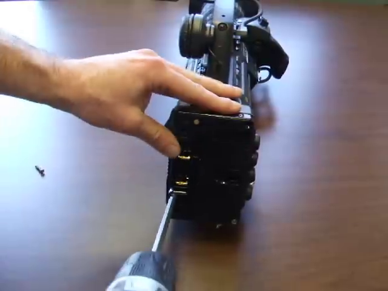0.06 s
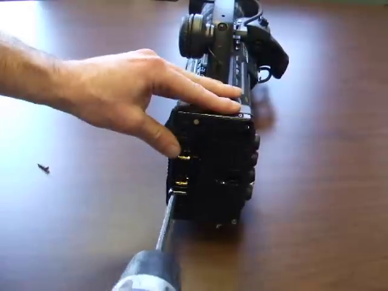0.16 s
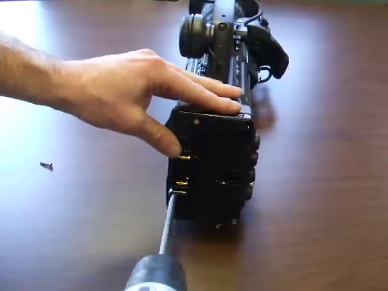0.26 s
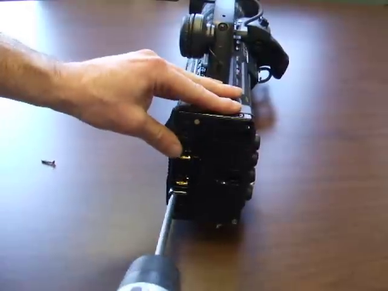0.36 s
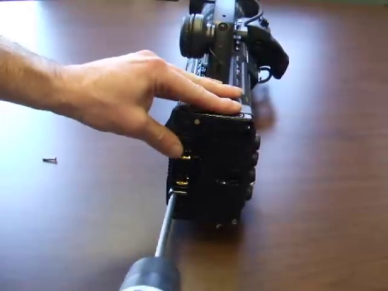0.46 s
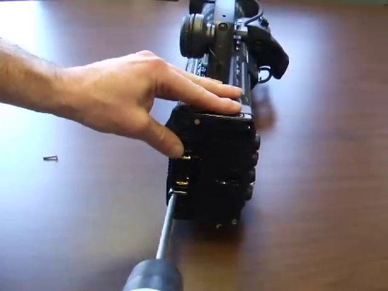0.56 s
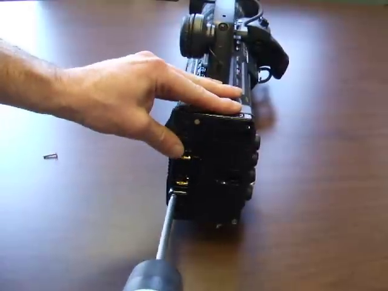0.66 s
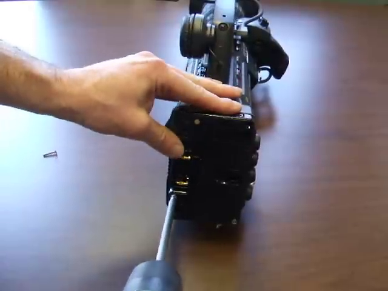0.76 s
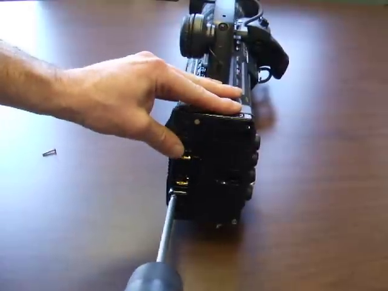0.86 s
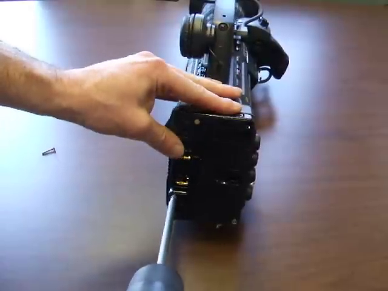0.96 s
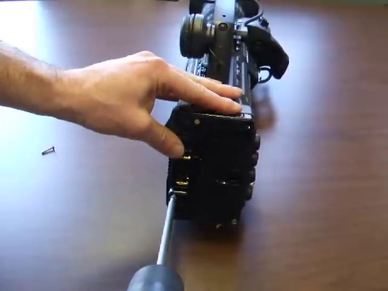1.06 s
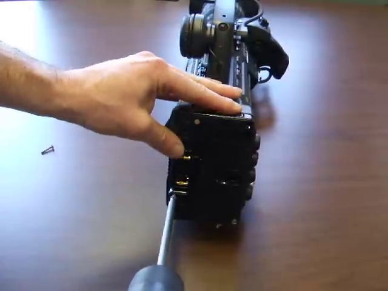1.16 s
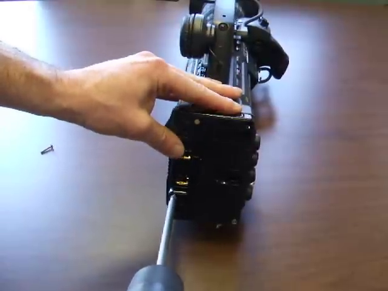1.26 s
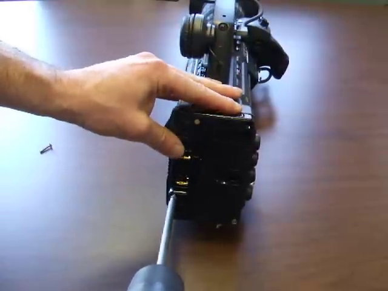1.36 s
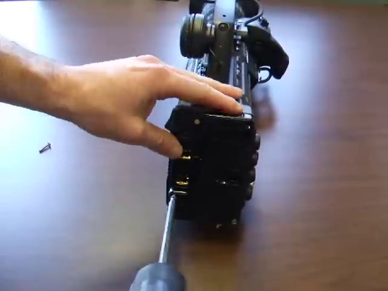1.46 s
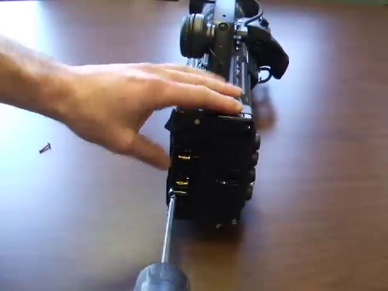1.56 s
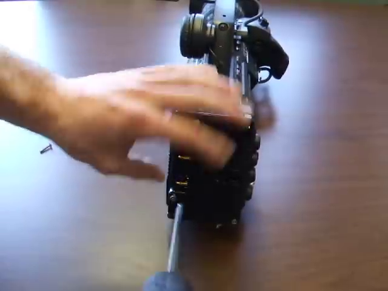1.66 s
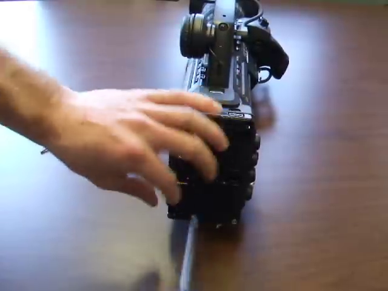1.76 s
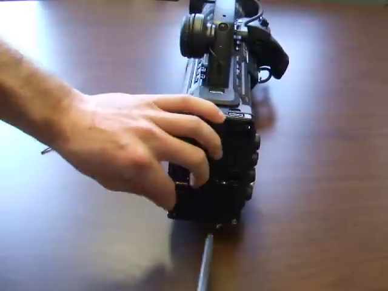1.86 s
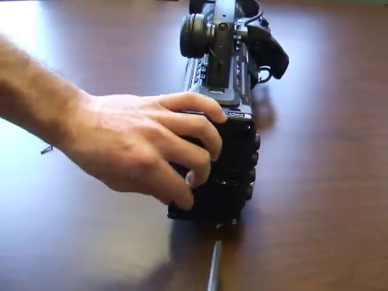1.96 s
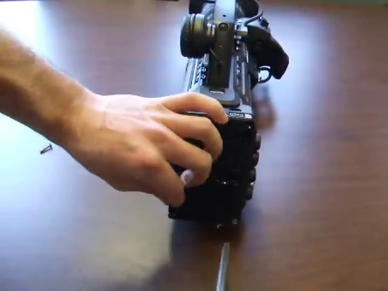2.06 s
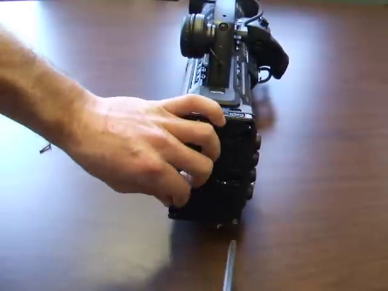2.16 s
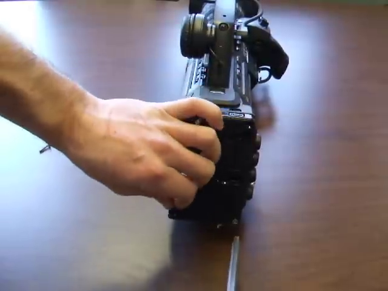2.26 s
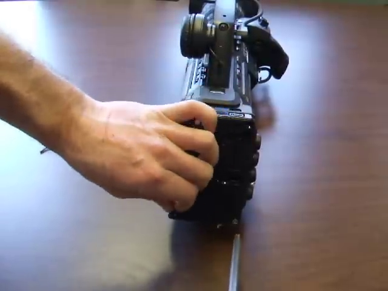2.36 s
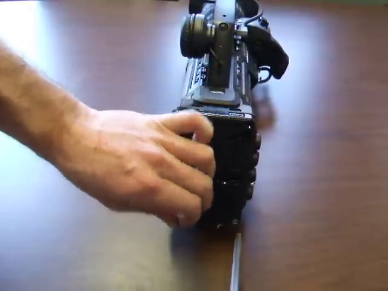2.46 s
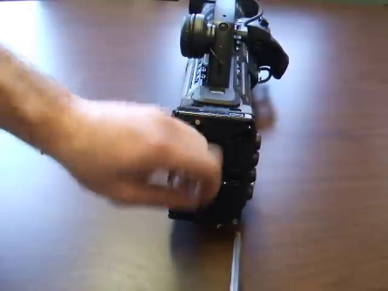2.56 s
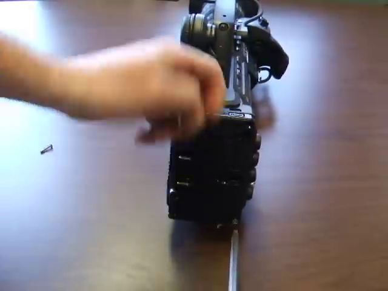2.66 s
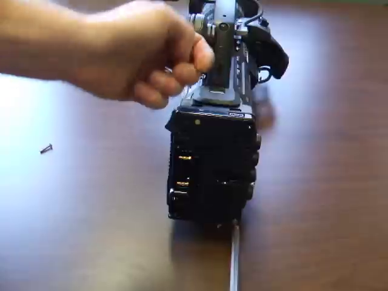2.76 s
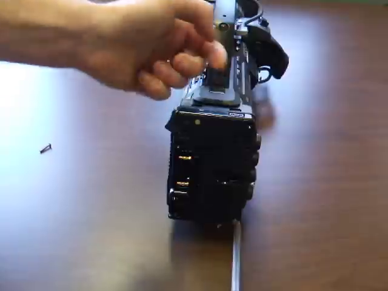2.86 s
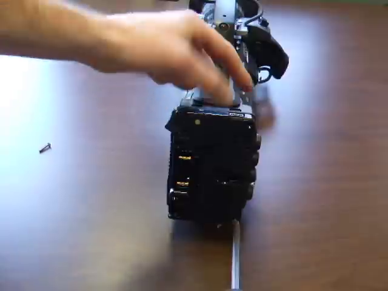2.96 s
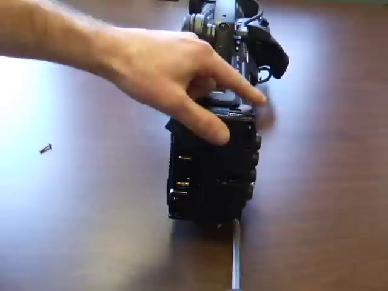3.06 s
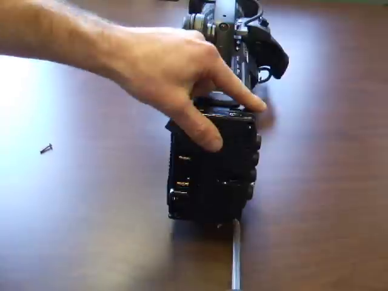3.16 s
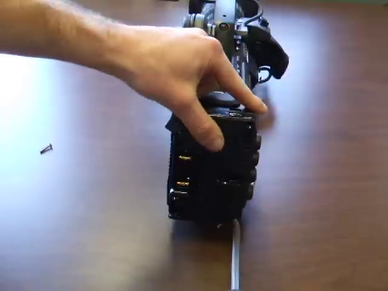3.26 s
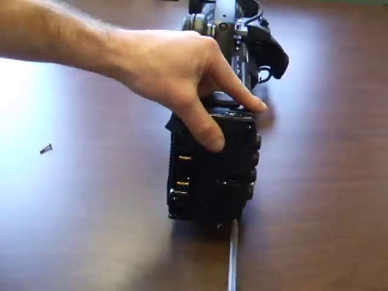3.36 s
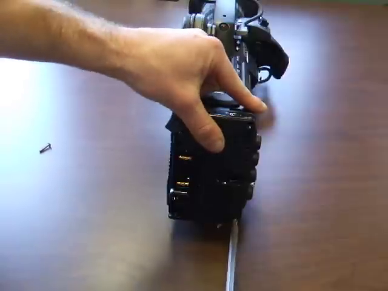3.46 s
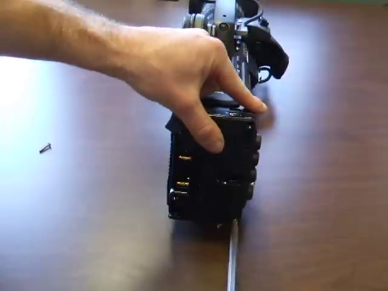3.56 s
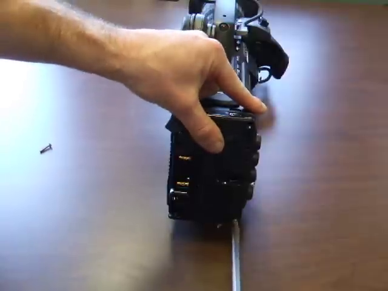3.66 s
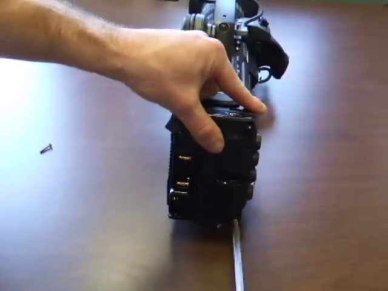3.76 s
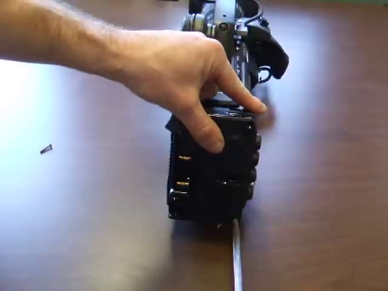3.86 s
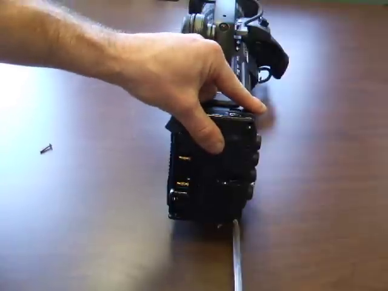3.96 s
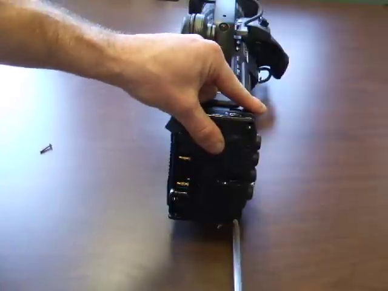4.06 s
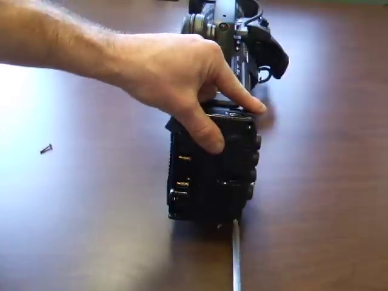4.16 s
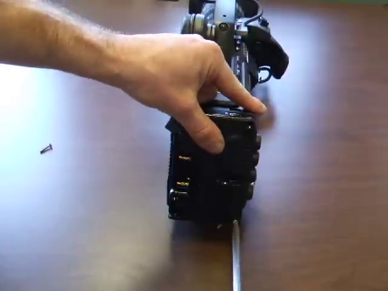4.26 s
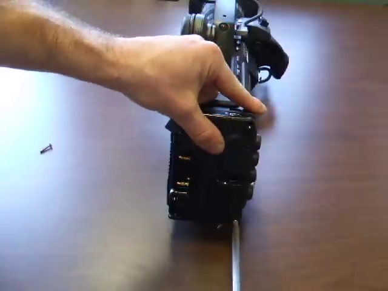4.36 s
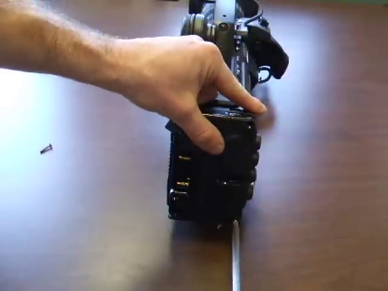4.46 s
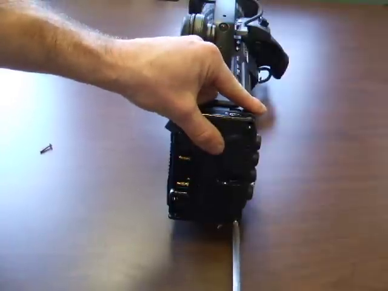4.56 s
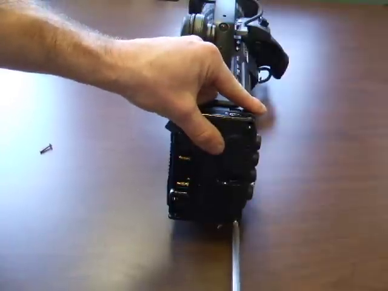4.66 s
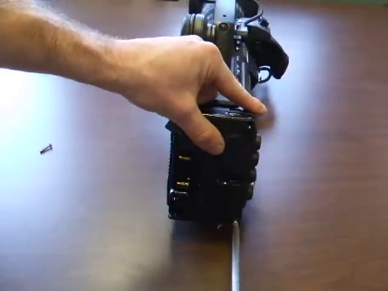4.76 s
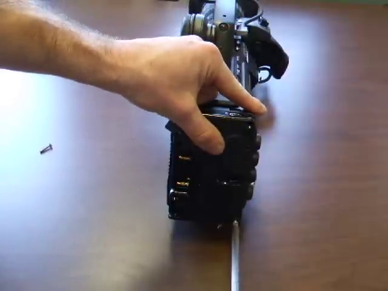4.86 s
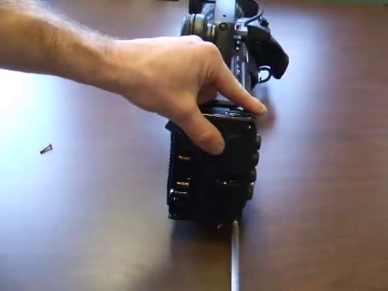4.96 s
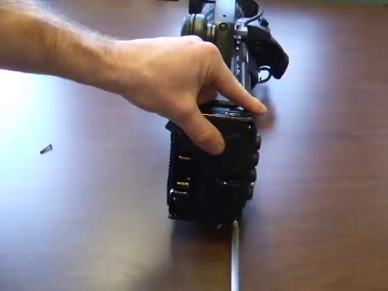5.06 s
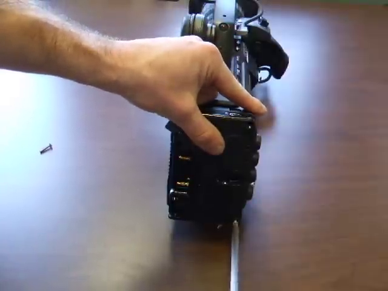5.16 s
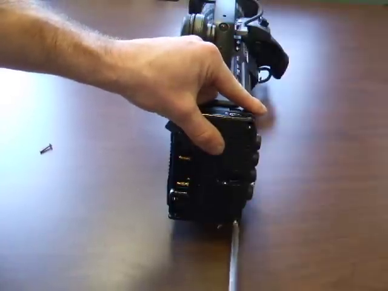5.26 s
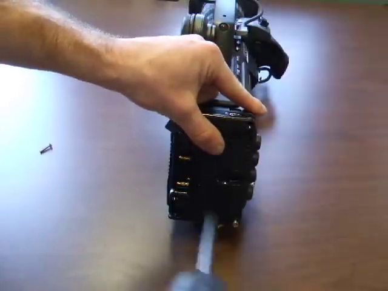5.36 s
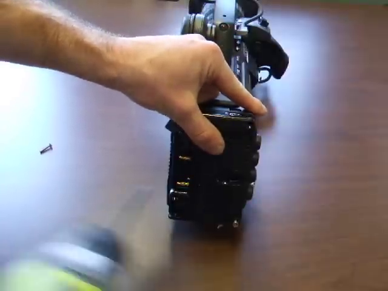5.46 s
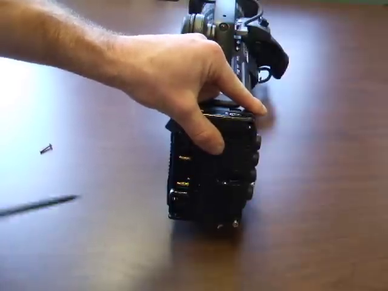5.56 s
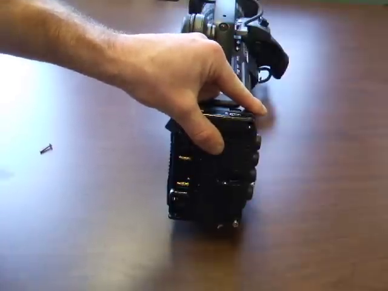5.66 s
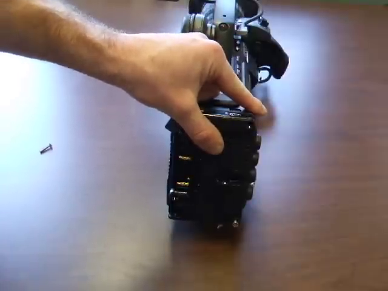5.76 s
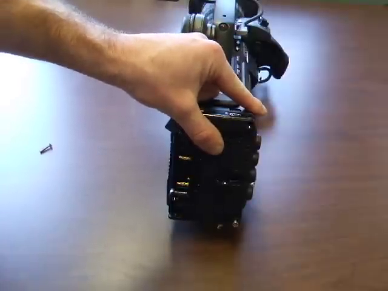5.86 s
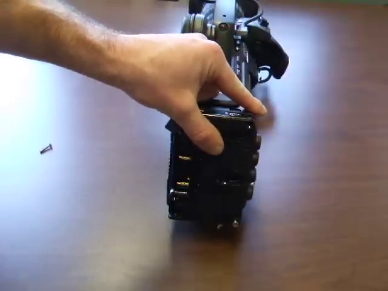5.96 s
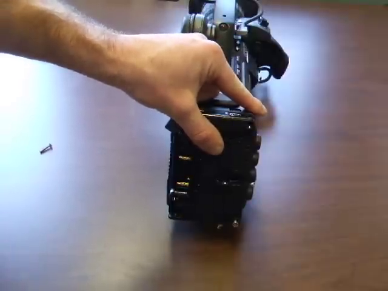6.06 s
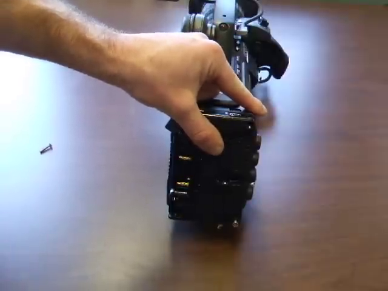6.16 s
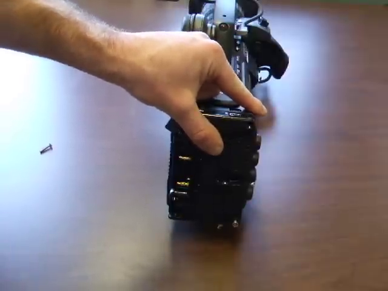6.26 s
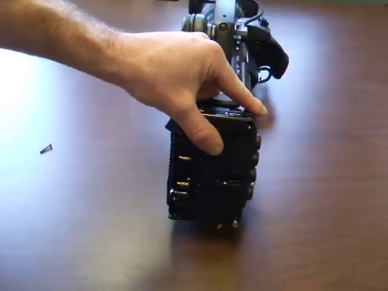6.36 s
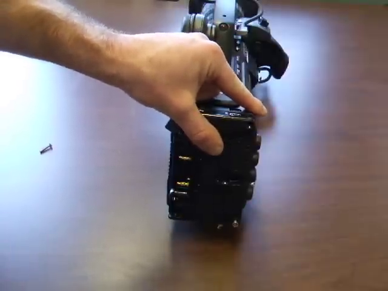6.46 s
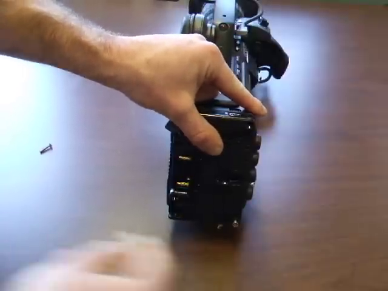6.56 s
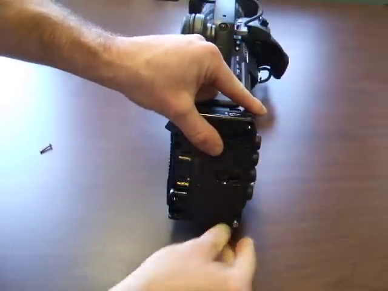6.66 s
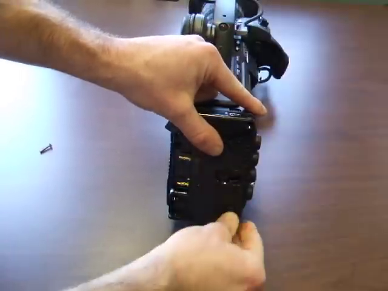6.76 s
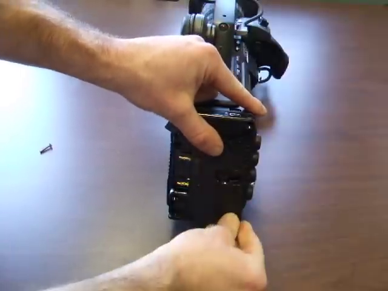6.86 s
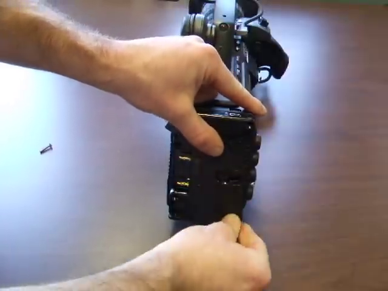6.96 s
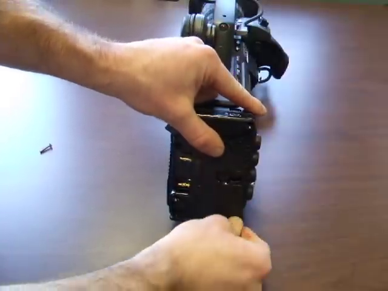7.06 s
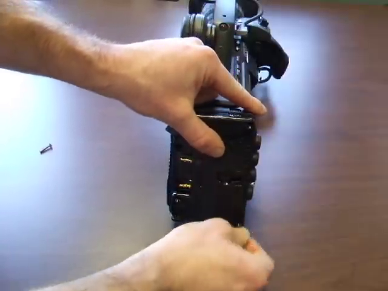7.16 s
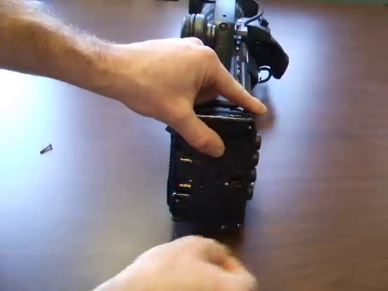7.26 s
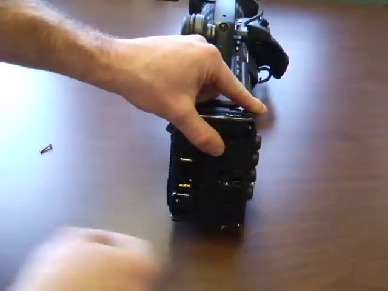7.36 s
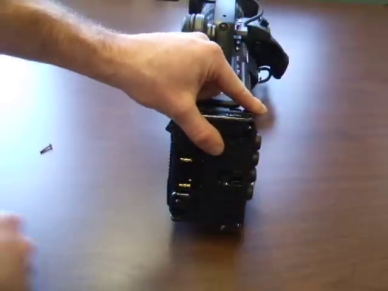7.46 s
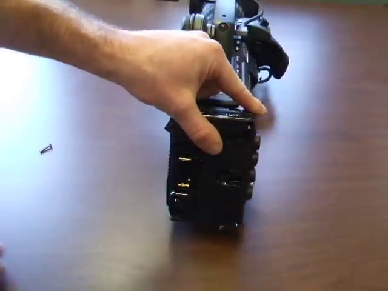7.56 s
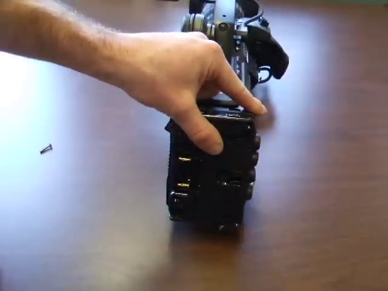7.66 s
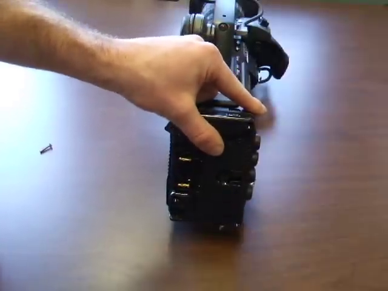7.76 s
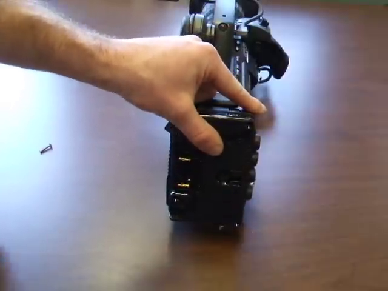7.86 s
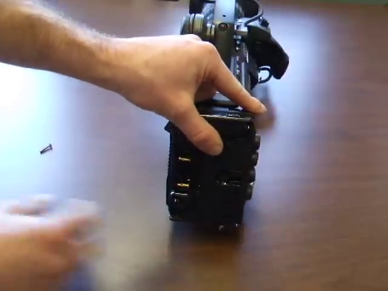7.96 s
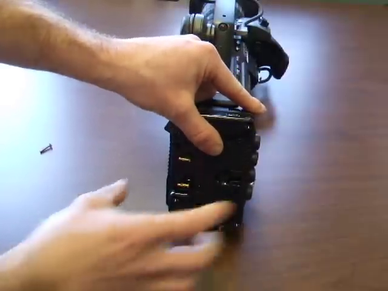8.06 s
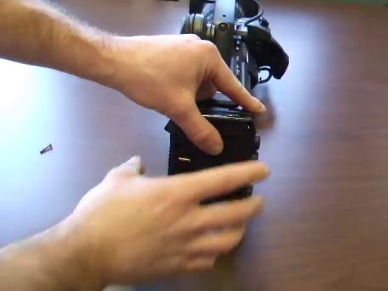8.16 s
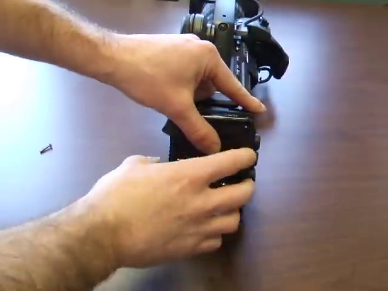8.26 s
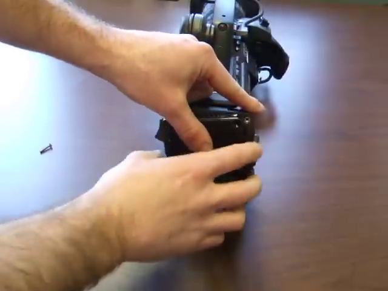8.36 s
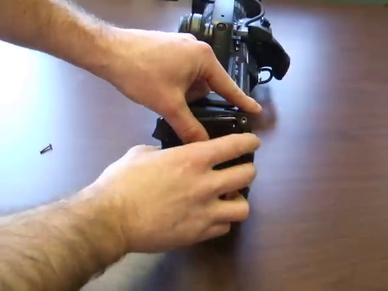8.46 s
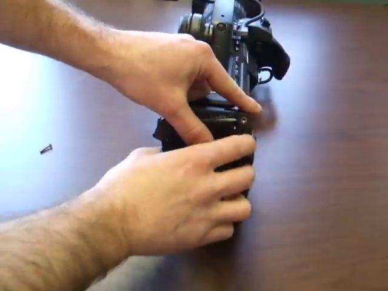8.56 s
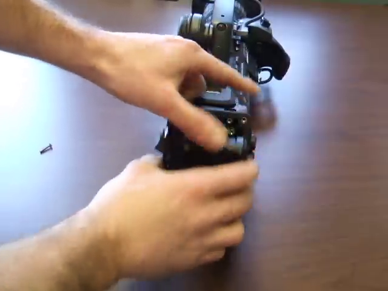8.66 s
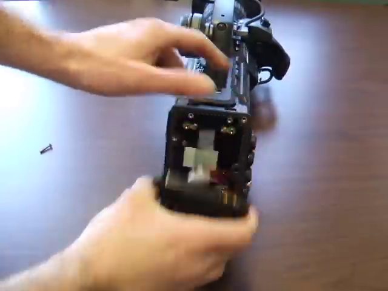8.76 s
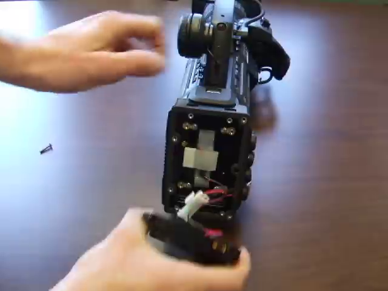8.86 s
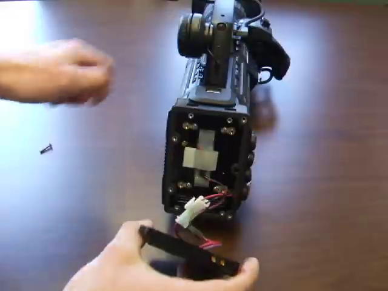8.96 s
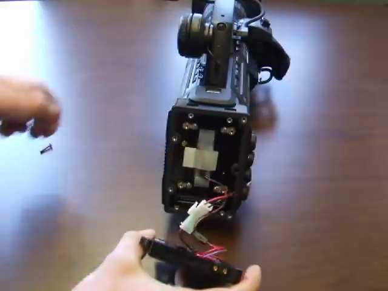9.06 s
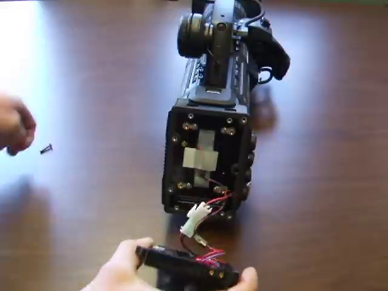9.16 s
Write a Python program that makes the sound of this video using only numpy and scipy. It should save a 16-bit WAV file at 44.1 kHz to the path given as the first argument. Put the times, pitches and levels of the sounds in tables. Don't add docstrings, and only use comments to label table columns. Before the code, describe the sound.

A cordless drill whirs in two roughly one-second bursts on a wooden desk, with sharp bit clatter, screw rattles and small plastic clicks between.

```python
import sys
import numpy as np
from scipy import signal
from scipy.fft import rfft, irfft, next_fast_len
from scipy.io import wavfile
from scipy.ndimage import uniform_filter1d

SR = 44100
rng = np.random.default_rng(int(sys.argv[2]) if len(sys.argv) > 2 else 0)


def store_wav(level_fs):
    pcm = np.round(np.clip(np.atleast_2d(level_fs), -1, 1) * 32767)
    wavfile.write(sys.argv[1], SR, pcm.T.astype(np.int16))


def ratio(d):
    e = np.asarray(d, float) / 20
    return 10 ** e


N = 406591
TIME = np.arange(N) / SR

# pitch_hz, density_db (dB per Hz)
AIR = [(12, -52), (20, -8.5), (32, -26), (49, -15.5), (161, -12), (211, -20.5), (422, -9.5), (785, -17),
       (1140, -17.5), (1650, -21), (1820, -19), (3390, -24.5), (7500, -22.5), (9750, -76), (16500, -120)]
# centre_hz, width_hz, level_db
FAN = [(55.4, 5.6, -61.5), (380.7, 22, -56), (431, 16.4, -51), (493.5, 12, -54), (1220, 140, -64)]
# pitch_hz, level_db
DRIVE = [(610.6, -60.5), (2443, -66), (5494, -70.5), (6105, -69)]
# time_s, level_db
DRIVE_TONE = [(0, -64), (4, -71.5), (5.5, -66.5), (7, -59), (7.6, -58.5), (9.22, -65.5)]
# centre_hz, spread_hz, strongest_line_db
CHIRPS = [(7867, 26, -62.5), (8134, 26, -66.5)]
# pitch_hz, gain_db
MIC = [(10, 1.5), (8200, -0.5), (8550, -11.5), (8900, -21.5), (9050, -49.5), (9300, -71)]

# pitch_hz, level_db, t60_s
DESK = [(100, -0.5, 0.052), (153.4, -0.5, 0.063), (242, -4.5, 0.084), (349, 6.5, 0.074), (506, -3, 0.19),
        (713, -6.5, 0.2), (1030, -5.5, 0.056)]
# start_s, peak_db, strongest_mode_hz, t60_scale
KNOCKS = [(0.223, -15.5, 390, 0.59), (2.302, -29.5, 427, 2.1), (2.316, -37, 380, 2.5), (2.41, -32, 433, 1),
          (3.058, -34.5, 150, 2.5), (3.357, -31.5, 415, 1.3), (3.694, -27, 364, 1.1),
          (6.191, -29, 172, 1.1), (6.244, -18.5, 168, 0.65), (7.112, -48, 166, 1.4), (7.158, -28, 173, 0.9),
          (8.871, -34.5, 431, 1.1), (9.074, -40, 366, 0.92)]
# start_s, level_db, hold_s, upper_knock_db
BUMPS = [
    (3.06, -43.5, 0.043, -53),
    (3.356, -40.5, 0.069, -37),
    (3.695, -29.5, 0.017, -24.5),
    (6.247, -35.5, 0.09, -23.5),
    (7.099, -41, 0.038, -44),
    (8.89, -44.5, 0.083, -41),
]
# start_s, level_db, hold_s, fall_db_per_s
RUBS = [
    (2.341, -31, .001, 867),
    (2.42, -25, .001, 2300),
    (7.16, -23.5, .001, 1500),
    (7.732, -43, .012, 2100),
    (7.74, -38.5, 0.04, 2100),
    (7.789, -26, .001, 550),
    (8.679, -46, .001, 300),
    (8.722, -50, .035, 1100),
    (8.87, -34.5, .001, 450),
]

# start_s, peak_db, ring_hz, crack_db (relative), crack_hz
BIT_TICKS = [(.1261, -35, 7220, -14, 2050), (.2224, -13, 6130, -8, 2120), (.2259, -11, 4610, -8, 2190),
             (.2344, -10, 7120, -15, 1410), (.2484, -17, 3340, -7, 1840), (.2583, -11, 3360, -12, 1900),
             (.2704, -14, 5190, -14, 2030), (.2828, -15, 7110, -13, 1450), (.2912, -11, 3590, -16, 2320),
             (.3167, -7, 4620, -22, 2330), (1.4814, -18, 6200, -6, 1320), (3.056, -29, 5440, -3, 1390),
             (3.3578, -30, 5410, -3, 2470), (3.6895, -14, 5560, -7, 2300), (4.0054, -17, 5810, -10, 1740),
             (6.1928, -22, 3250, -5, 1390), (6.2437, -25, 3050, -7, 1140)]
# start_s,
# peak_db, ring_hz, crack_db (relative)
LONE_TICKS = [(1.8477, -31, 4180, -9), (1.9106, -37, 6100, -12), (2.1655, -35, 3570, -13),
              (2.1984, -20, 5650, -26), (2.2174, -35, 5730, -15), (2.2618, -37, 4370, -6),
              (2.3424, -20, 5630, -17), (7.0354, -13, 5530, -21), (7.0579, -28, 5540, -17),
              (7.1137, -11, 5520, -26), (7.1606, -13, 6030, -23), (7.0803, -20, 5540, -19),
              (7.0983, -14, 6340, -24), (7.7872, -14, 7350, -20), (7.7904, -15, 7390, -25),
              (7.8024, -25, 3600, -18), (8.4417, -39, 6850, -6), (8.6857, -33, 6630, -17),
              (8.7494, -33, 7190, -14), (8.8727, -22, 7300, -8), (9.0744, -43, 6700, -1),
              (9.0957, -33, 7100, -8)]
# start_s, gap_s, hits, peak_db, ring_hz
RATTLES = [
    (2.3002, .0092, 4, -17, 7350),
    (2.4034, .006, 5, -19, 5500),
    (7.0164, .0068, 3, -20, 5700),
    (7.1245, .0102, 4, -19, 5600),
]

# time_s, pitch_hz, level_db
TRIGGER = [
    [(.145, 6000, -60), (.155, 5750, -44), (.195, 5400, -42), (.205, 5300, -60)],
    [(3.938, 7200, -50), (3.948, 5800, -44), (3.96, 5350, -38), (3.978, 5100, -38), (3.985, 5100, -60)],
]
# start_s, squeeze_s, settle_s, settle_shape, release_s
PULL_A, PULL_B = (.16, .146, .063, .9, 1.424), (3.953, .085, .082, .75, 5.226)
# time_after_release_s, speed_left (share)
BRAKE = [(0, 1), (.034, .955), (.047, .86), (.058, .66), (.069, .51), (.113, .29)]
# time_s, level_db
EFFORT_A, EFFORT_B = [(.16, -41.5), (.206, -24.5), (.236, -20), (.248, -30.5), (.35, -26.5), (.55, -24.5),
                      (1.06, -26)], [(3.953, -39), (3.972, -26), (4.0, -20.5), (4.08, -23), (4.45, -24),
                                        (5.15, -24)]
POLE_ORDERS = (1, 2, 3, 9, 12)
# cruise_db, shudder_db, slow_loss_db, loss_sets_in (speed share), grip_lift_db
POLES_A, POLES_B = [(-58, -36, 0, 1, 11.5), (-64, -56, 0, 1, 5), (-45, -34, 15, .035, -2),
                    (-56, -41, 0, 1, 1), (-36, -55, 12, .13, 0)], [(-56.5, -42, 4, .1, 11), (-62, -52, 0, 1, 12),
                                     (-41, -27.5, 11, .035, -2), (-46, -32, 3, .05, 4),
                                     (-45.5, -52, -18.5, .075, -2)]
# jolt_s, jolt_db, screw_loose_s, wobble_db
RUMBLE_A, RUMBLE_B = (.075, -31, .95, -44), (.03, -36, .82, -46)
# pitch_hz, level_db
WHINE_A, WHINE_B = [(1254, -48), (2035, -53), (3300, -52), (3763, -40), (4710, -42), (5012, -49),
                    (5335, -48), (5647, -45), (5954, -50), (6266, -44), (6595, -38), (6912, -50),
                    (7208, -47), (7537, -40), (7833, -48), (8166, -53), (8463, -54)], [(1254, -45), (1884, -51), (2353, -52), (2821, -45), (3763, -46),
                                     (4387, -50), (4705, -42), (5017, -50), (5642, -42), (6266, -50),
                                     (6584, -36), (6901, -44), (7208, -48), (7526, -32), (7833, -48),
                                     (8166, -53), (8473, -47)]
# pitch_hz, density_db (dB per Hz)
GEARS_A, GEARS_B = [(590, -58.5), (1010, -19), (1280, -4.5), (1570, -11.5), (1960, -2), (2190, -10),
                    (3560, -4), (3660, -3.5), (4360, -7), (4560, -8.5), (4930, -8.5), (7270, 1), (8300, -9),
                    (10800, -40), (18300, -120)], [(590, -54), (1010, -14), (1270, -8), (2230, -9), (2730, -5.5),
                                     (2990, -7.5), (4680, -5.5), (5250, -9.5), (5630, -2.5), (6260, -9.5),
                                     (7270, 0), (7800, -6), (8300, -8.5), (10800, -65), (18300, -120)]
# pitch_hz, width_hz, lift_db
SHELL = [(4580, 200, 4.5), (5500, 300, 5), (5800, 220, 8), (7100, 400, 6), (7750, 300, 7)]

FULL_HZ = 313.6


def level(x, db):
    return x * ratio(db) / np.sqrt(np.mean(x ** 2))


def peak(x, db):
    return x * ratio(db) / np.abs(x).max()


def colour(x, points):
    hz, db = np.transpose(points)
    size = next_fast_len(len(x))
    bins = np.log(np.arange(size // 2 + 1) * SR / size + 1)
    return irfft(rfft(x, size) * ratio(np.interp(bins, np.log(hz), db)), size)[:len(x)]


def band(x, hz, width):
    return signal.lfilter(*signal.iirpeak(min(hz, .45 * SR), hz / width, fs=SR), x)


def walk(rate, size=N):
    k = int(SR / rate)
    steps = np.repeat(rng.standard_normal(size // k + 1), k)
    return 1.26 * uniform_filter1d(uniform_filter1d(steps, k), k)[:size]


def fall(t, hold, db_per_s):
    return np.clip(t / .002, 0, 1) * ratio(-db_per_s * np.maximum(t - hold, 0))


def span(rows):
    s, *columns = np.transpose(rows)
    where = slice(int(s[0] * SR), min(int(s[-1] * SR), N))
    t = TIME[where]
    fade = np.clip(np.minimum(t - s[0], s[-1] - t) / 0.002, 0, 1)
    return where, fade, [np.interp(t, s, c) for c in columns]


def background():
    drive_hz, frame_hz = 1832.5, 30000 / 1001
    air_shape = AIR[:-2] + [(8400, AIR[-3][1] - 9)]
    out = level(colour(rng.standard_normal(N), air_shape), -48)
    for hz, width, db in FAN:
        out += level(band(rng.standard_normal(N), hz, width), db) * ratio(1.5 * walk(3))
    for hz, db in DRIVE:
        out += ratio(db + 1.1 * walk(0.97)) * np.sin(2 * np.pi * hz * TIME)
    swell = ratio(np.interp(TIME, *np.transpose(DRIVE_TONE)))
    out += np.sqrt(2) * swell * np.sin(2 * np.pi * drive_hz * TIME)
    for hz, spread, db in CHIRPS:
        for k in np.arange(-3.5, 4):
            line = np.sin(2 * np.pi * (hz + k * frame_hz) * TIME + np.pi * k * k / 3)
            out += np.sqrt(2) * ratio(db) * np.exp(-abs(k * frame_hz / spread) + .5) * line
    return out


def room(x):
    t60_s, tail_db = 0.56, -11
    t = np.arange(int(.6 * SR)) / SR
    noise = rng.standard_normal(len(t)) * (1 - np.exp(-t / 0.0056))
    low = band(noise, 500, 2500)
    tail = low * ratio(-60 * t / t60_s) + (noise - low) * ratio(-60 * t / (0.55 * t60_s))
    return x + signal.fftconvolve(x, tail * ratio(tail_db) / np.sqrt(np.sum(tail ** 2)))[:N]


def handling():
    out, t = np.zeros(N + SR), np.arange(SR // 2) / SR
    for s, db, hold, db_per_s in RUBS:
        grains = rng.standard_normal(len(t)) * ratio(1.1 * walk(400, len(t)))
        slide = fall(t, hold, db_per_s) + ratio(-28) * fall(t, hold, 108)
        out[int(s * SR):][:len(t)] += slide * level(band(grains, 4900, 3300), db)
    for s, db, hold, knock_db in BUMPS:
        shake = rng.standard_normal(len(t)) * ratio(2 * walk(40, len(t)))
        low = level(sum(ratio(g) * band(shake, f, 60) for f, g, _ in DESK[:3]), -1.5)
        upper = level(band(band(shake, 750, 600), 750, 600), -3)
        rock = ratio(db) * fall(t, hold, 131)
        knock = ratio(knock_db) * fall(t, 0, 901) + ratio(-16) * rock
        out[int(s * SR):][:len(t)] += rock * low + knock * upper
    return out[:N]


def knocks():
    out, t = np.zeros(N + SR), np.arange(SR // 2) / SR
    for s, db, hz, hold in KNOCKS:
        modes = DESK + [(hz, 5, .09)]
        ring = np.zeros(len(t))
        for (f, g, t60), r in zip(modes, rng.standard_normal(len(modes))):
            decay = ratio(g - 60 * t / (t60 * max(hold, .3)))
            ring += decay * np.sin(2 * np.pi * f * (1 + 0.057 * r) * t + 40 * r)
        out[int(s * SR):][:len(t)] += peak(ring * (1 - np.exp(-t / 0.00058)), db)
    return out[:N]


def contacts():
    middle_crack_hz, screw_width_hz = 1900, 330
    rows = [(*row, 420) for row in BIT_TICKS]
    for row, r in zip(LONE_TICKS, rng.uniform(-1, 1, len(LONE_TICKS))):
        rows.append((*row, middle_crack_hz * 1.4 ** r, screw_width_hz))
    for s, gap, hits, db, hz in RATTLES:
        for k, r in enumerate(rng.uniform(-1, 1, (hits, 4))):
            late = (k + .1 * r[0] * (k > 0)) * gap
            ring_hz, crack_hz = hz * 1.07 ** r[2], middle_crack_hz * 1.4 ** r[3]
            rows.append((s + late, db + 2 * r[1], ring_hz, -15.5, crack_hz, screw_width_hz))
    return rows


def ticks():
    out, t = np.zeros(N + SR), np.arange(SR // 20) / SR
    for s, db, hz, crack_db, crack_hz, width in contacts():
        chatter = rng.standard_normal(len(t)) * (1 - np.exp(-t / .0002)) * np.exp(-t / .0018)
        ring = 2.3 * np.sqrt(550 / width) * band(chatter, hz, width)
        bright = ring + band(band(chatter, 5200, 6500), 5200, 6500)
        crack = band(chatter, crack_hz, 250) + .4 * band(chatter, 2800, 2200)
        out[int(s * SR):][:len(t)] += peak(bright, db) + peak(crack, db + crack_db + 8)
    return out[:N]


def trigger():
    out = np.zeros(N)
    for rows in TRIGGER:
        where, fade, (hz, db) = span(rows)
        out[where] = fade * ratio(db) * np.sin(2 * np.pi * np.cumsum(hz) / SR)
    return out


def shell_db(hz):
    return sum(db / (1 + (2 * (hz - f) / w) ** 2) for f, w, db in SHELL)


def rotor(pull):
    lag_start, lag_squeezed = .76, .18
    start, squeeze, settle, shape, release = pull
    where = slice(int(start * SR), int((release + BRAKE[-1][0]) * SR))
    t = TIME[where] - start
    ramp = lag_start + (lag_squeezed - lag_start) * t / squeeze
    creep = lag_squeezed * np.exp(-(np.maximum(t - squeeze, 0) / settle) ** shape)
    lag = np.where(t < squeeze, ramp, creep)
    braking = t + start - release
    return where, t, braking, FULL_HZ * (1 - lag) * np.interp(braking, *np.transpose(BRAKE))


def drill(pull, effort, poles, desk, lines, gears, slack_db):
    where, t, braking, hz = rotor(pull)
    size, brake_bite_s = len(hz), .064
    db = np.interp(TIME[where], *np.transpose(effort))
    db -= 380 * np.maximum(braking - brake_bite_s, 0)
    drive = np.minimum(ratio(db - effort[-1][1]), 1)
    lag = 1 - hz / FULL_HZ
    grip = 1 / (1 + (t / .52) ** 4)

    passing = 1 / (1 + (2 * (hz - 180) / 40) ** 2)
    growl_db = -11.5 + np.where(braking > 0, 11, 2) * np.sqrt(passing)
    shudder = passing * np.where(braking > 0, np.sqrt(drive) * ratio(-2), 1)

    jolt_s, jolt_db, wobble_s, wobble_db = desk
    shake = ratio(jolt_db) * fall(t - jolt_s, 0, 75) + ratio(-62)
    shake += ratio(wobble_db) * np.clip((t - wobble_s) / .1, 0, 1) * np.sqrt(drive)

    turn = 2 * np.pi * np.cumsum(hz * (1 + .0018 * walk(60, size))) / SR
    whine = np.zeros(size)
    for order, (cruise_db, shudder_db, loss, share, lift) in zip(POLE_ORDERS, poles):
        slow_loss = loss * (1 - np.exp(-(lag / share) ** 2)) + 2.3 * order * lag
        cruise = drive * ratio(cruise_db - slow_loss + lift * grip)
        whine += (cruise + ratio(shudder_db) * shudder) * np.sin(order * turn)
    for f, line_db in lines:
        order = round(f / FULL_HZ)
        if abs(f / FULL_HZ - order) < .15 and order not in POLE_ORDERS:
            slack = slack_db * lag * np.where(braking > 0, 3, 1)
            firm = 2.5 * walk(30, size) - slack + (2 if f < 8300 else 11)
            firm += (-42.5 - line_db - 14 * (f > 8300)) * np.minimum(lag / .07, 1)
            firm -= 4 * (order == 4)
            firm += shell_db(order * hz) - shell_db(order * FULL_HZ)
            whine += drive * ratio(line_db + firm) * np.sin(order * turn + 2 * np.pi * rng.random())

    once_a_turn = 1 + 0.12 * np.cos(turn) + 0.17 * np.cos(3 * turn)
    teeth = rng.standard_normal(size) * once_a_turn * ratio(1.17 * walk(150, size))
    mesh = colour(teeth, gears[:-2])
    growl = band(band(mesh, 1320, 480), 1320, 480)
    hiss = level(mesh - growl, -0.41)
    hiss += ratio(growl_db + 1.2 * walk(29.2, size)) * level(growl, -1.64)
    rumble = shake * level(band(band(teeth, 150, 230), 150, 230), -1.7)
    rumble += ratio(db) * level(band(teeth, 590, 490), -25.0)
    out = np.zeros(N)
    out[where] = fall(t, 0, 0) * fall(t[::-1], 0, 0) * (ratio(db) * hiss + rumble + 1.58 * whine)
    return out


def scene():
    near = drill(PULL_A, EFFORT_A, POLES_A, RUMBLE_A, WHINE_A, GEARS_A, slack_db=50)
    near = near + drill(PULL_B, EFFORT_B, POLES_B, RUMBLE_B, WHINE_B, GEARS_B, slack_db=28)
    near = near + trigger() + ticks() + knocks() + handling()
    return (room(near) + background())[None]


def top_cut(x):
    return signal.sosfilt(signal.butter(12, 9270, fs=SR, output="sos"), x)


def record(dry):
    mix = colour(dry[0], MIC)[None] - .0024
    return top_cut(mix)


dry = scene()
out = record(dry)
store_wav(out)
```